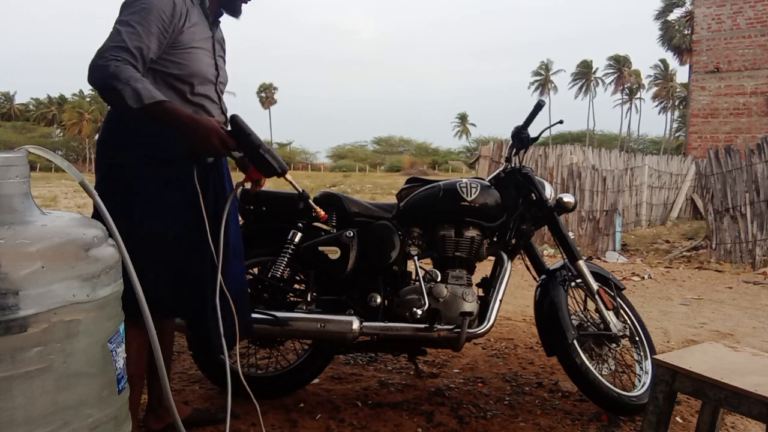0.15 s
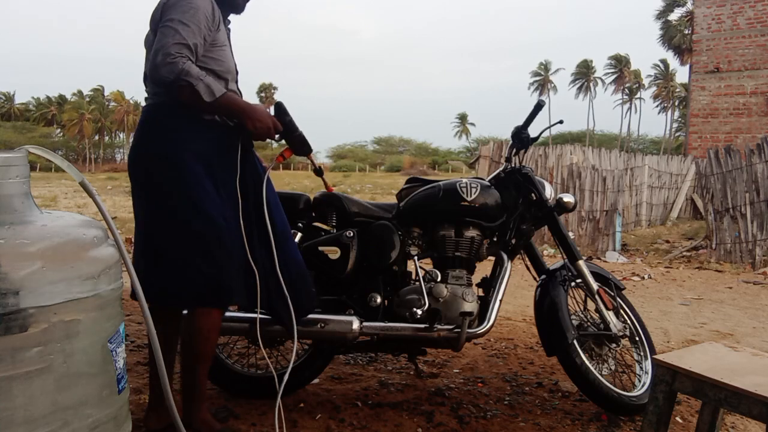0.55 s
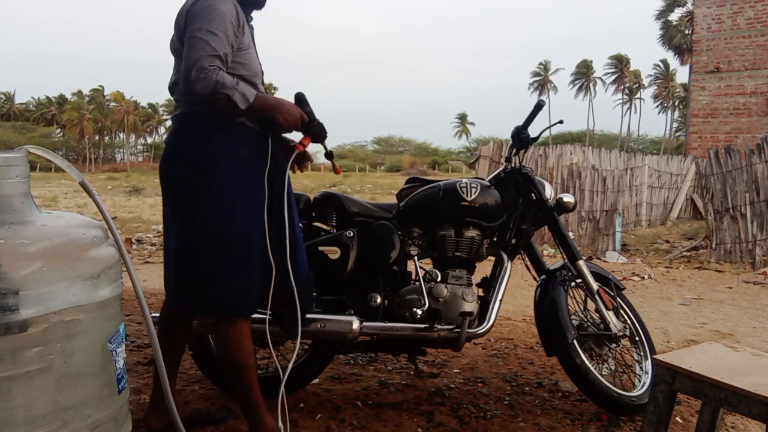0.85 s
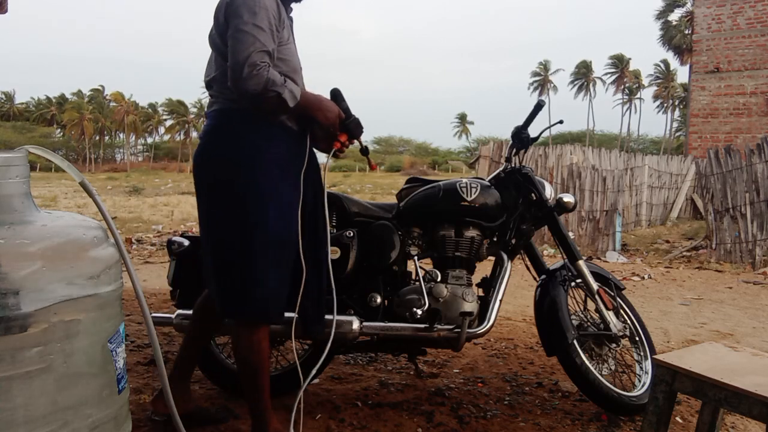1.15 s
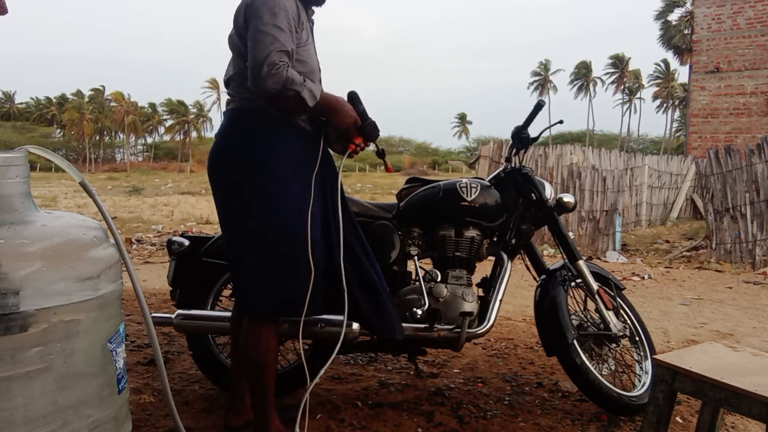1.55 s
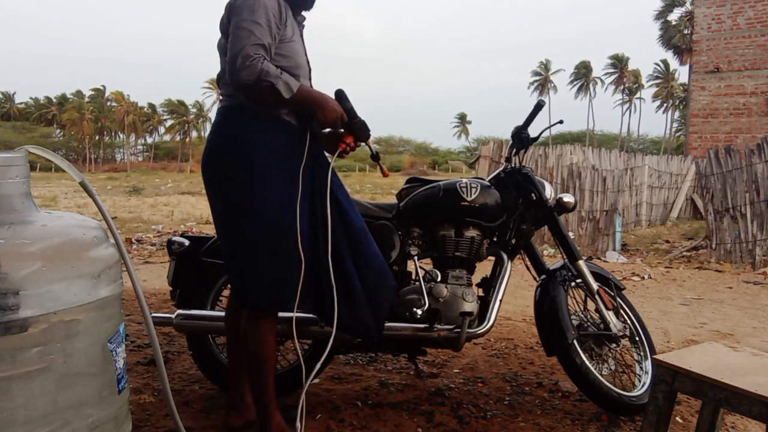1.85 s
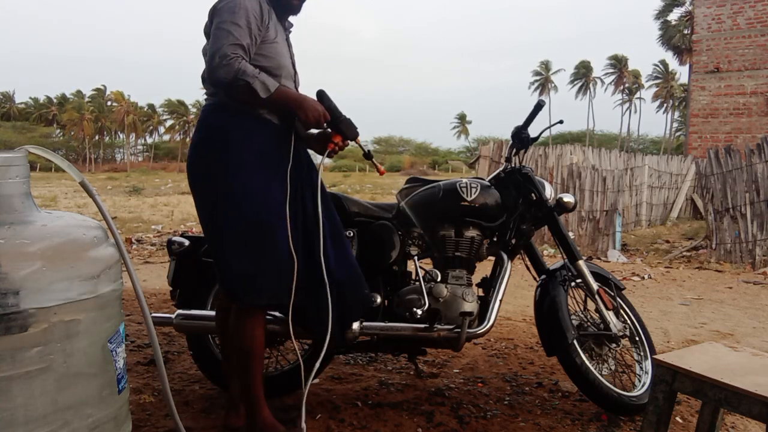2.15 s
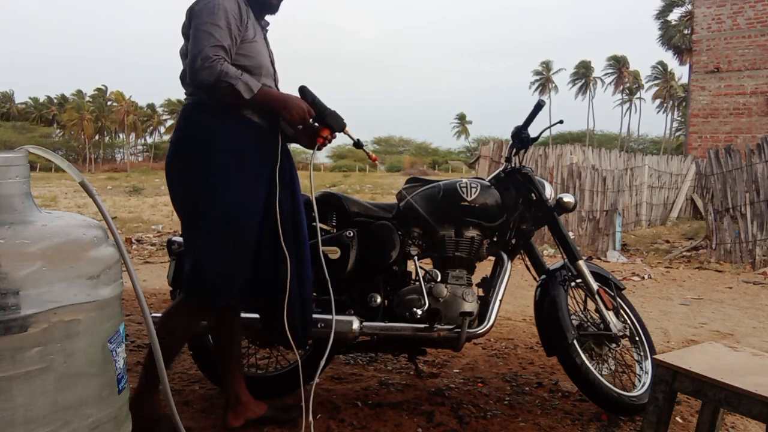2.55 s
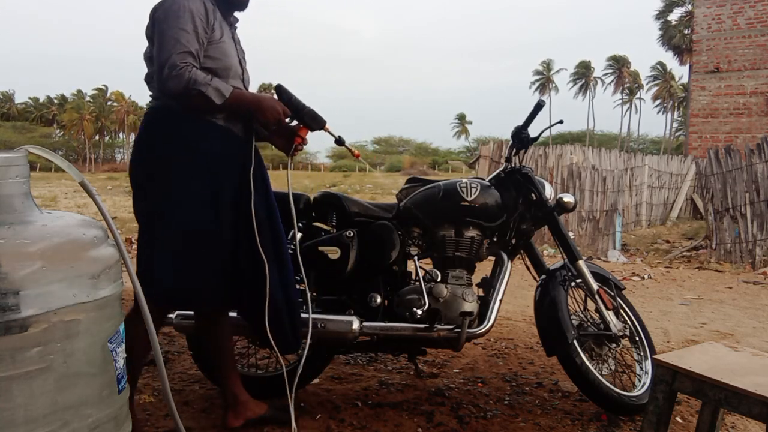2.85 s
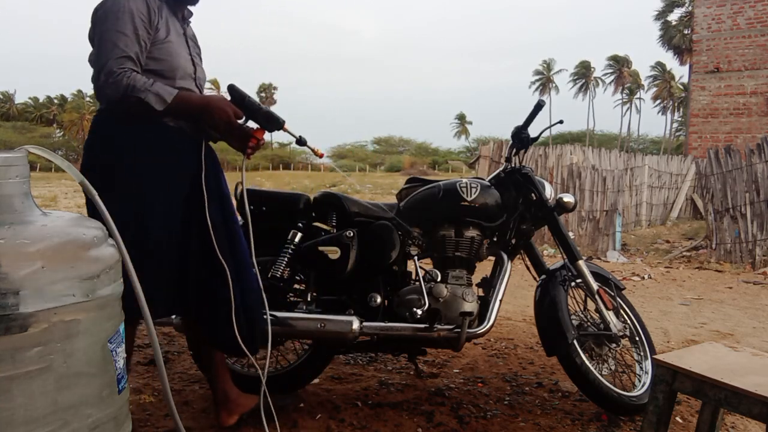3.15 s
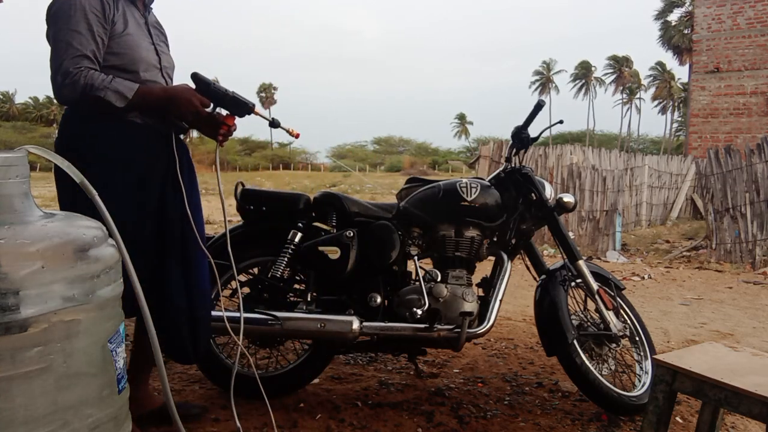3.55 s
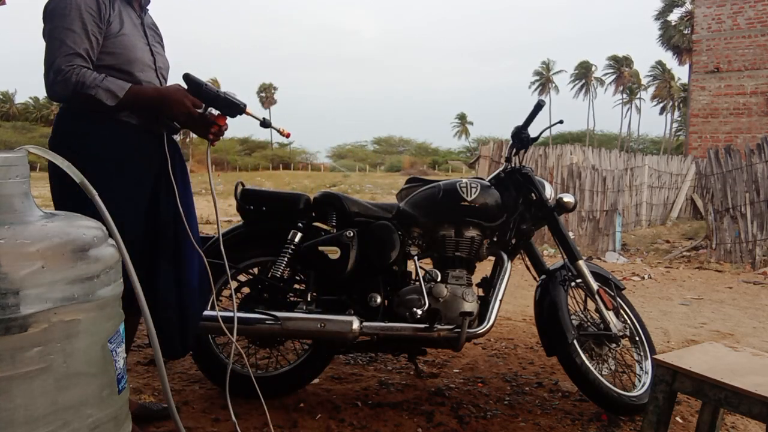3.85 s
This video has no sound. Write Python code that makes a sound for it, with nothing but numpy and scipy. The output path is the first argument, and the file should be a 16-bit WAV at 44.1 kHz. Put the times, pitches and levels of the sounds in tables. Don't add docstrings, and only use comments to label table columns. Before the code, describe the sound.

A small electric pressure washer starts at about 2.1 s and runs to the end: buzzing motor, rapid valve rattle, pulsing bright hiss, irregular sharp spits and brief gurgles of trapped air; a low boom swells around 2.8 s, then the tone firms up. Before it, a quiet yard: light wind, faint chirps near 0.4 and 1.1 s, footfall at 0.7 s, hose rustles and knocks at 1.2-1.6 s, distant dove coos at 1.5-2 s.

```python
import sys
import numpy as np
from scipy import signal
from scipy.fft import rfft, irfft, next_fast_len
from scipy.io import wavfile
from scipy.ndimage import uniform_filter1d, map_coordinates

SR = 44100
rng = np.random.default_rng(int(sys.argv[2]) if len(sys.argv) > 2 else 0)


def wav_record(signal):
    frames = np.transpose(np.atleast_2d(signal))
    bounded = np.clip(frames, -1, 1)
    quanta = np.round(bounded * 32767).astype(np.int16)
    wavfile.write(sys.argv[1], SR, quanta)


def how_loud(loudness_db):
    steps = np.asarray(loudness_db, float) / 20
    return 10 ** steps


N = 176400
T = np.arange(N) / SR
SLOW = T[::64]
SWITCH_S = 2.077
RUNNING = slice(round(SWITCH_S * SR), N)

# time_s, shaft_turns_per_s
SHAFT_SPEED = [(2.15, 40.2), (2.38, 40.55), (2.58, 40.2), (2.8, 39.7), (3.06, 39.2), (3.45, 39.4),
               (4, 39.6)]


def unit(x):
    return x / np.sqrt(np.mean(x ** 2) + 1e-20)


def curves(rows):
    s, *cols = np.transpose(rows)
    return [np.interp(T, s, c) for c in cols]


def wobble(rate):
    return map_coordinates(rng.standard_normal(int(N * rate / SR) + 4), [T * rate])


def drift(rate):
    return map_coordinates(rng.standard_normal(200), [SLOW * rate])


def filtered(x, response):
    m = next_fast_len(N + 8192)
    return irfft(rfft(x, m) * response(np.fft.rfftfreq(m, 1 / SR) + 1), m)[:N]


def rush(points, patchy_db, wide=6, long=8):
    z = signal.stft(rng.standard_normal(N + 512), nperseg=512)[2]
    across_bins = uniform_filter1d(rng.standard_normal(z.shape), wide, 0)
    patches = uniform_filter1d(across_bins, long, 1)
    x = signal.istft(z * how_loud(patchy_db * unit(patches)), nperseg=512)[1][:N]
    f, v = np.transpose(points)
    return unit(filtered(x, lambda hz: how_loud(np.interp(np.log(hz), np.log(f), v))))


def band(x, lo_hz, hi_hz):
    return unit(signal.sosfilt(signal.butter(3, [lo_hz, hi_hz], "band", fs=SR, output="sos"), x))


def add(out, s, x):
    part = out[round(s * SR):][:len(x)]
    part += x[:len(part)]


def whistle(rows):
    s, hz, db = np.transpose(rows)
    t = np.arange(s[0], s[-1], 1 / SR)
    edge = np.clip(np.minimum(t - s[0], s[-1] - t) / 0.002, 0, 1)
    glide = uniform_filter1d(np.interp(t, s, hz), size=200)
    hoarse_db = 4 * wobble(220)[:len(t)]
    return edge * how_loud(np.interp(t, s, db) + hoarse_db) * np.sin(2 * np.pi * np.cumsum(glide) / SR)


def shaft():
    spin_up_s, jitter = 0.1, 0.0006
    up = np.clip((T - SWITCH_S) / spin_up_s, 0, 1)
    speed = curves(SHAFT_SPEED)[0] * (0.85 + 0.15 * up)
    return up, 2 * np.pi * np.cumsum(speed * (1 + jitter * wobble(24.64))) / SR


def shaft_order(k, gain, wobble_db, phase, turn):
    level = np.interp(T[RUNNING], SLOW, gain * how_loud(wobble_db * drift(4.97)))
    phase_drift = np.interp(T[RUNNING], SLOW, 0.15 * drift(25.93))
    odd_shift = k % 2 * np.pi / 2
    return level * np.cos(k * turn[RUNNING] + odd_shift + phase + phase_drift)


def housing_boom(boom_db, p, turn):
    # shaft_order, priming_db, pressurised_db
    orders = [(14, -9, -16), (15, -17, -10), (16, 0, -5), (17, -19, -15), (18, -7, 0), (19, -16, -9)]
    surge_s, surge_wide_s, surge_db = 2.99, 0.11, 5
    surge = surge_db * np.exp(-((SLOW - surge_s) / surge_wide_s) ** 2)
    x = np.zeros(N)
    for k, priming_db, pressed_db in orders:
        order_db = priming_db + (pressed_db - priming_db) * p + (k in (15, 17)) * surge
        x[RUNNING] += shaft_order(k, how_loud(boom_db + order_db), 1.2, -np.arctan((k - 16) / 2), turn)
    return x


def valve_whine(rattle_db, p, speed, turn):
    # pitch_hz, width_hz, priming_db, pressurised_db
    modes = [(923.5, 88, -4, -27), (1032, 41, -12, -4), (1116, 28, -16, -8), (1178, 35, -13, -11.5),
             (1269, 70, -9.5, -16), (1479, 114, -11, -5.5), (1575, 96, -17, -8.5),
             (2132, 317, -15.5, -16.5), (2410, 40, -28, -11.5)]
    x = np.zeros(N)
    for k in np.arange(21, 63):
        gain = 0
        for hz, width, priming_db, pressed_db in modes:
            mode_db = priming_db + (pressed_db - priming_db) * p ** 3
            gain = gain + how_loud(mode_db) / (1 + (2 * (k * speed - hz) / width) ** 4)
        odd_db = k % 2 * -9.5 * (1 - p)
        level = how_loud(rattle_db + 3 + odd_db) * gain
        x[RUNNING] += shaft_order(k, level, 1.6, 2 * np.pi * rng.random(), turn)
    return x


def valve_rattle(rattle_db, turn):
    # pitch_hz, level_db
    casing = [(250, -49), (420, -13), (623, -4.5), (723, -5.5), (811, -5), (1340, -6.5), (1480, -8),
              (1700, -5.5), (3000, -24.5), (3900, -27), (6600, -120)]
    gate = 1 + 0.48 * np.cos(2 * turn)
    return how_loud(np.interp(T, SLOW, rattle_db) - 2) * gate * rush(casing, patchy_db=2.0)


def pump(up, turn):
    # time_s, housing_boom_db, valve_rattle_db, pressure (0-1)
    running = [(2.15, -52.5, -49.5, 0.3), (2.34, -40.5, -46.5, 0.62), (2.46, -53, -49, 0.6),
               (2.58, -41.5, -48.5, 0.04), (2.75, -36.5, -46.5, 0), (2.95, -37.5, -48.5, 0.45),
               (3.02, -39, -46, 0.6), (3.25, -44, -47.5, 0.88), (3.47, -45, -46.5, 1),
               (3.74, -45.5, -46, 0.96), (4, -49.5, -46.5, 1)]
    # time_s, pitch_hz, level_db
    whirr = [(2.08, 720, -54), (2.105, 700, -57), (2.13, 850, -53), (2.15, 1000, -58)]
    start_drop_db = 15
    speed, boom_db, rattle_db, pressure = np.array(curves(SHAFT_SPEED) + curves(running))[:, ::64]
    p = np.clip(pressure, 0, 1)
    x = housing_boom(boom_db, p, turn)
    x += valve_whine(rattle_db, p, speed, turn)
    x += valve_rattle(rattle_db, turn)
    x *= (T > SWITCH_S) * how_loud(-start_drop_db * (1 - up))
    add(x, whirr[0][0], whistle(whirr))
    return x


def spray(turn):
    # time_s, level_db
    flow = [(2.13, -51), (2.25, -52), (2.6, -49.5), (2.9, -48), (3.1, -47.5), (4, -48.5)]
    # pitch_hz, level_db
    hiss_colour = [(1410, -14), (2400, -3), (2960, -3.5), (3600, -3.5), (3980, -4.5), (4440, -2), (5200, 0),
                   (6790, -0.5), (7500, -2.5), (9750, -27), (16500, -120)]
    # pitch_hz, level_db
    fizz_colour = [(6000, -62), (7500, 2), (9000, 6), (16000, -10)]
    # pitch_hz, width_hz, boost_db
    nozzle = [(3600, 60, 7), (4500, 80, 7), (5050, 90, 6)]
    # start_s, peak_db
    spits = [
        (2.0765, -48.5),
        (2.13, -28.5),
        (2.4144, -32),
        (2.549, -26),
        (2.779, -27),
        (2.9324, -33),
        (3.088, -29.5),
        (3.3226, -30.5),
        (3.5508, -29),
        (3.927, -33),
    ]
    # start_s, peak_db, centre_hz, t60_s
    gurgles = [
        (2.076, -50, 3800, 0.034),
        (2.173, -39.5, 1460, .05),
        (2.96, -34, 675, .12),
        (2.093, -50.5, 3020, 0.032),
        (2.158, -42, 6000, 0.028),
        (2.158, -44, 10000, .03),
        (2.912, -39, 3720, 0.065),
        (2.935, -22, 7200, 0.013),
        (3.01, -45, 3230, 0.19),
    ]
    spit_t60_s = 0.034
    flow_db, = curves(flow)
    first_water = (T > SWITCH_S) * (0.092 + 3 * np.clip(T - SWITCH_S, 0, 0.045))
    opening = np.clip((T - 2.12) / 0.068, 0, 1) + first_water
    pulse_db = 1.04 * wobble(14) + 0.38 * wobble(60) + 0.55 * np.cos(turn) + 1.7 * np.cos(2 * turn)

    def nozzle_gain(f):
        return how_loud(sum(db / (1 + (2 * (f - hz) / width) ** 2) for hz, width, db in nozzle))

    hiss = filtered(rush(hiss_colour, 2.1, wide=2, long=30), nozzle_gain)
    fizz = rush(fizz_colour, patchy_db=1.6)
    x = opening * how_loud(flow_db + pulse_db) * (0.81 * hiss + how_loud(-5.5 + wobble(29.79)) * fizz)
    t = T[:SR // 5]
    for s, db in spits:
        droplets = fizz[round(s * SR / 2):][:len(t)]
        burst = droplets + 0.35 * band(rng.standard_normal(len(t)), 4000, 7500)
        add(x, s, how_loud(db - 10.5 - 60 * t / spit_t60_s) * (1 - np.exp(-t / 0.00052)) * burst)
    for s, db, hz, t60 in gurgles:
        bubble = band(rng.standard_normal(len(t)), hz * 0.893, hz * 1.11)
        add(x, s, how_loud(db - 60 * t / t60) * (1 - np.exp(-t / 0.0038)) * bubble)
    return x


def handling():
    # start_s, length_s, peak_db, pitch_hz
    knocks = [
        (.692, .0135, -26, 259),
        (0.704, 0.0129, -26.5, 175),
    ]
    # start_s, peak_db, pitch_hz, t60_s
    thuds = [(0.199, -49, 85, 0.16), (0.294, -40.5, 111, 0.1), (.41, -51.5, 260, .3),
             (0.632, -40.5, 207, 0.088), (0.681, -49, 242, 0.051), (.722, -39, 262, 0.066),
             (.733, -37.5, 189, 0.12), (.747, -42, 169.7, 0.31), (.78, -41, 279.5, 0.14),
             (0.824, -44, 224, 0.1), (.855, -47, 228, .1), (.89, -43, 238, 0.06), (1.41, -54.5, 173, 0.36),
             (1.64, -55, 76, 0.57), (1.85, -48, 222, 0.065), (2, -56, 58, 0.18), (2.29, -52, 111, .2),
             (2.56, -48.5, 85, .2), (3.09, -49.5, 120, 0.23), (3.3, -50, 110, 0.56)]
    # start_s, length_s, level_db, low_hz, high_hz
    rustles = [(0.691, 0.028, -60.5, 2500, 8800), (0.764, 0.031, -64.5, 2900, 5900),
               (.769, 0.019, -68.5, 9000, 9900), (0.899, 0.096, -58.5, 720, 1600),
               (1.205, 0.076, -72, 3300, 8800), (1.305, 0.026, -63, 3600, 9500),
               (1.322, 0.037, -64.5, 3400, 8100), (1.3, .12, -71, 2700, 6700),
               (0.692, 0.06, -55.5, 850, 2740), (1.527, 0.076, -49.5, 570, 1720),
               (1.525, 0.068, -62.5, 2480, 5900), (1.53, 0.064, -74, 8200, 10400),
               (1.432, .03, -82, 9900, 10600), (1.889, 0.019, -66.5, 4700, 5700)]
    # start_s, peak_db, low_hz, high_hz
    ticks = [
        (.697, -46, 2200, 2730),
        (1.2374, -67, 3500, 12000),
        (1.2374, -61, 8500, 10700),
        (1.307, -49.5, 4480, 5200),
        (1.323, -54, 4500, 5300),
        (1.3914, -45.5, 1100, 2280),
        (1.3915, -65, 4000, 11000),
        (1.532, -46.5, 900, 1890),
        (1.578, -63, 3500, 13000),
    ]
    tick_t60_s = 0.034
    x, t = np.zeros(N), T[:SR // 3]
    for s, length, db, hz in knocks:
        bump = np.sin(np.pi * np.clip(t / length, 0, 1) ** 1.3) ** 2
        add(x, s, how_loud(db) * bump * np.cos(2 * np.pi * hz * (t - 0.64 * length)))
    for s, db, hz, t60 in thuds:
        ring = np.sin(2 * np.pi * hz * t) + 0.46 * band(rng.standard_normal(len(t)), hz * 0.48, hz * 1.44)
        add(x, s, how_loud(db - 60 * t / t60) * (1 - np.exp(-t / 0.002)) ** 2 * ring)
    for s, length, db, lo_hz, hi_hz in rustles:
        grain_db = 3.0 * rng.standard_normal(len(t) // 60 + 1).repeat(60)[:len(t)]
        grit = rng.standard_normal(len(t)) * how_loud(grain_db)
        swell = how_loud(db - 10.8 * (t / length) ** 1.4) * (1 - np.exp(-t / (0.13 * length)))
        add(x, s, swell * band(grit, lo_hz, hi_hz))
    for s, db, lo_hz, hi_hz in ticks:
        snap = band(rng.standard_normal(len(t)), lo_hz, hi_hz)
        add(x, s, how_loud(db - 3 - 60 * t / tick_t60_s) * snap)
    return x


def birds():
    # time_s, pitch_hz, level_db
    chirp = [(0, 5020, -12), (.012, 5900, -7), (.017, 4610, -11), (.029, 5500, 3), (.043, 4500, 0),
             (.052, 3250, -3), (.064, 4400, 2.5), (.09, 3650, 7.5), (.108, 3100, -8)]
    # start_s, level_db
    calls = [
        (.327, -62),
        (.447, -65),
    ]
    # time_s, pitch_hz, level_db
    upper_voice = [(1.05, 3600, -76), (1.09, 4100, -70), (1.112, 4650, -63), (1.125, 4300, -65),
                   (1.135, 3600, -72)]
    # time_s, pitch_hz, level_db
    lower_voice = [(1.075, 3050, -74), (1.09, 3500, -67), (1.105, 3780, -76)]
    # start_s, length_s, level_db
    coos = [
        (1.48, .1, -70),
        (1.6, .2, -61),
        (1.84, .21, -63),
    ]
    coo_hz = 624.6
    x = np.zeros(N)
    for s, db in calls:
        add(x, s, how_loud(db) * whistle(chirp))
        add(x, s + 0.008, how_loud(db - 7) * whistle(chirp))
    for voice in upper_voice, lower_voice:
        add(x, voice[0][0], whistle(voice))
    coo_phase = 2 * np.pi * np.cumsum(coo_hz + 3.7 * wobble(20)) / SR
    flutter = how_loud(1.6 * wobble(40.2)) * np.sin(coo_phase)
    for s, length, db in coos:
        x += how_loud(db + 3.5) * np.sin(np.pi * np.clip((T - s) / length, 0, 1)) * flutter
    return x


def echoes(x, wet_db):
    t60_s, first_wall_s = 0.21, 0.012
    t = T[:SR // 2]
    tail = rng.standard_normal(len(t)) * how_loud(-60 * t / t60_s) * (t > first_wall_s)
    return x + how_loud(wet_db) * signal.fftconvolve(x, tail / np.linalg.norm(tail))[:N]


def yard():
    # time_s, level_db
    gusts = [(0, -60.5), (.3, -64), (.47, -59.5), (.6, -67.5), (.85, -59), (1.1, -66), (1.6, -63.5),
             (1.77, -64.5), (2.1, -70), (2.28, -57), (2.45, -62.5), (2.75, -58), (3, -62), (3.38, -58),
             (3.55, -62.5), (3.75, -58.5), (3.92, -59), (4, -59)]
    # pitch_hz, level_db
    rumble = [(40, -20), (80, -4.5), (200, -2.5), (330, -3.5), (440, -24.5), (800, -75)]
    # pitch_hz, level_db
    murmur_colour = [(300, -13), (500, -1), (900, -0.5), (1900, -7), (2700, -19), (6000, -28.5),
                     (7500, -34), (16000, -49)]
    wind_db, = curves(gusts)
    wind = how_loud(wind_db + 1.5 + 1.8 * wobble(14)) * rush(rumble, patchy_db=2.5)
    murmur = how_loud(-64.5 + 0.71 * wobble(6.64)) * rush(murmur_colour, 5, wide=1, long=20)
    return wind + murmur


def scene():
    up, turn = shaft()
    washer = pump(up, turn) + spray(turn)
    return (washer + echoes(handling(), -13) + echoes(birds(), -5) + yard())[None]


def low_pass(x):
    return signal.sosfilt(signal.butter(12, 17090, fs=SR, output="sos"), x)


def record(dry):
    # pitch_hz, level_db
    capsule = [(7000, 0.5), (8200, -5.5), (9700, 2.5), (11500, -0.5), (13600, -3.5), (15100, 13.5),
               (15700, 7)]
    low_cut_hz, top_hz = 49, 15750
    opens_s, fade_s = 0.066, 0.19
    f, v = np.transpose(capsule)

    def response(hz):
        return how_loud(np.interp(hz, f, v)) * (hz < top_hz) / (1 + (low_cut_hz / hz) ** 4)

    mix = filtered(dry[0], response)[None] * np.clip((T - opens_s) / fade_s, 0, 1)
    return low_pass(mix)


dry = scene()
out = record(dry)
wav_record(out)
```